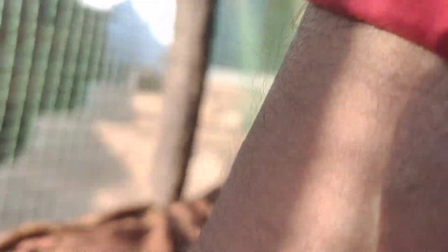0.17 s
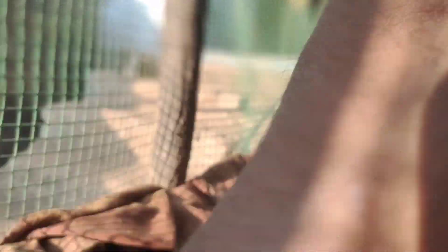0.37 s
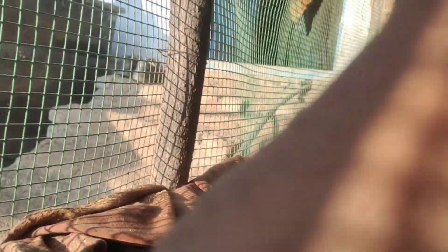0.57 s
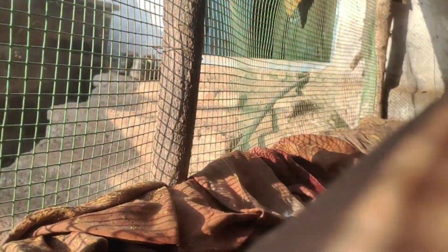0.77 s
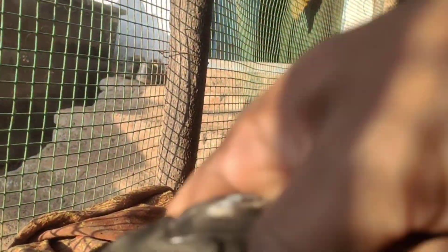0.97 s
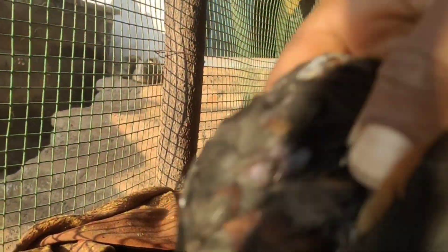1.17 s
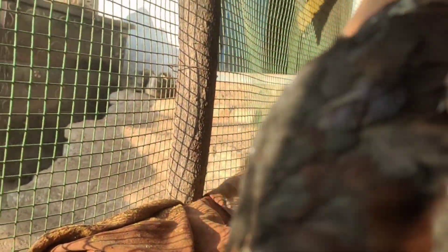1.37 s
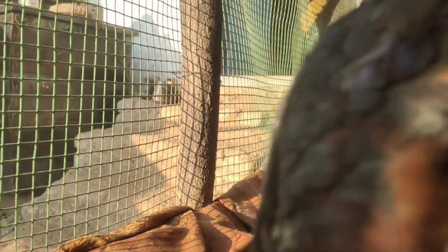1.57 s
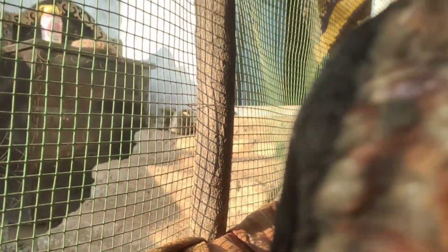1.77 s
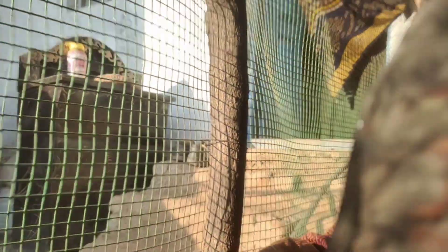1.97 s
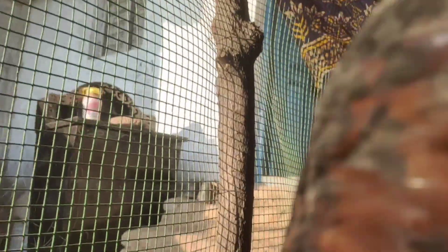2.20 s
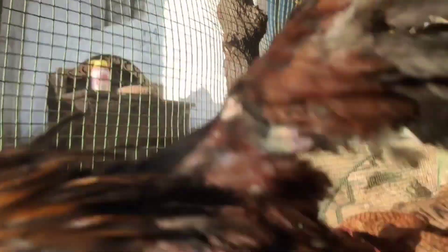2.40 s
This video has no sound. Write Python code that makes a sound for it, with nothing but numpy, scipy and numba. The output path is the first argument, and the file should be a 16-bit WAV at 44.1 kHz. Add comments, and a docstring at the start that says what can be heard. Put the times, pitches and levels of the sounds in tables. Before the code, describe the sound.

A hen gives a run of short clucks, then four raspy squawks close to the microphone as she is handled. Cloth and feathers rustle, the wooden coop is knocked, and air puffs buffet the microphone while other hens murmur faintly.

```python
"""A held hen squawks four times at close range, after a run of clucks in a wire coop.
Her voice follows the source-filter principle: membranes in the syrinx pulse the airflow, and throat
and beak resonances shape it. A second membrane modulates the first, turning a clear tone to a rasp.
Puffs of air strike the right microphone, knocks ring the coop, and cloth and feathers rustle.
A chick peeps, other hens murmur behind, and the yard walls return a short echo."""
import sys
import numpy as np
from scipy import signal
from scipy.fft import rfft, irfft, next_fast_len
from scipy.io import wavfile
from scipy.ndimage import uniform_filter1d, minimum_filter1d, map_coordinates
from numba import njit

SR = 44100
rng = np.random.default_rng(int(sys.argv[2]) if len(sys.argv) > 2 else 0)


def int16_out(signal):
    """Quantize to a 16-bit WAV file."""
    q = np.round(np.clip(np.atleast_2d(signal).T, -1, 1) * 32767)
    wavfile.write(sys.argv[1], SR, q.astype(np.int16))


N = 107559
T = np.arange(N) / SR

# Vocal tract through each squawk: time_s, relative_body_db, treble_db, nominal_throat_hz
TRACT_1 = [(1.062, -22, -49, 1310.0), (1.081, -5.5, -21.5, 1560), (1.11, 6.5, -6.5, 1830),
           (1.143, -14.5, -35, 1460), (1.174, 4.5, -8, 1640.0), (1.205, -17.5, -16, 1500),
           (1.257, -14, -16.5, 1560), (1.275, -12, -23.5, 1370), (1.294, -31, -48, 1430)]
TRACT_2 = [(1.487, -30.0, -37.2, 1320.0), (1.498, -17.6, -29.4, 1380.0), (1.503, -10.1, -19.5, 1380.0),
           (1.53, -14.7, -20.9, 1460.0), (1.575, -18.0, -24.2, 1610.0), (1.61, -18.7, -27.0, 1740.0),
           (1.64, -14.1, -20.6, 1620.0), (1.675, -16.7, -26.9, 1610.0), (1.703, -33.1, -41.1, 1600.0)]
TRACT_3 = [(1.83, -34.9, -36.7, 1590.0), (1.847, -15.0, -29.7, 1390.0), (1.867, -9.1, -20.3, 1800.0),
           (1.91, -14.4, -21.4, 1660.0), (1.95, -15.7, -18.6, 1560.0), (2.02, -12.4, -20.0, 1840.0),
           (2.06, -12.8, -22.9, 1530.0), (2.085, -19.6, -30.7, 1530.0), (2.105, -34.0, -46.1, 1330.0)]
TRACT_4 = [(2.15, -34.2, -36.0, 1240.0), (2.17, -22.0, -35.7, 1370.0), (2.202, -16.9, -29.3, 1330.0),
           (2.219, -21.7, -32.2, 1520.0), (2.225, -12.3, -21.7, 1510.0), (2.25, -14.0, -20.5, 1570.0),
           (2.29, -19.4, -25.3, 1750.0), (2.34, -15.6, -25.9, 1770.0), (2.39, -19.8, -28.4, 1520.0),
           (2.425, -30.7, -32.5, 1520.0)]
# Membrane vibration through each squawk: time_s, pitch_hz, roughness (0 to 1)
VIBRATION_1 = [(1.06, 472.7, 0.18), (1.083, 854.6, 0.14), (1.096, 829.5, 0.13), (1.104, 655.2, 0.66),
               (1.172, 683.3, 0.67), (1.186, 761, 0.11), (1.21, 770.6, 0), (1.228, 785.6, 0.39),
               (1.255, 738.5, 0.14), (1.29, 586, 0.65)]
VIBRATION_2 = [(1.487, 520, 0.94), (1.508, 619, 0.71), (1.532, 715.3, 0.38), (1.57, 692.4, 0.51),
               (1.61, 716, 0.76), (1.645, 739, 0.86), (1.675, 702, 0.89), (1.703, 578, 0.56)]
VIBRATION_3 = [(1.83, 570, 0.47), (1.85, 637.4, .4), (1.865, 905.4, 0.067), (1.876, 921.6, 0.13),
               (1.89, 952.4, 0.9), (1.95, 908.8, 0.78), (1.968, 689.1, 0.65), (2.005, 692.1, 0.52),
               (2.055, 745.4, 0.998), (2.105, 617, 0.96)]
VIBRATION_4 = [(2.15, 537.3, 0.802), (2.205, 629.6, 0.87), (2.23, 741, 0.68), (2.255, 795, 0.39),
               (2.285, 814.6, 0.861), (2.33, 735.5, 0.77), (2.385, 727.5, 0.94), (2.425, 546.3, 1)]
# How the hen faces in each squawk, with pan as left minus right:
# left_lag_ms, body_pan_db, treble_pan_db, second_beak_mode_db, third_beak_mode_db
HEN_POSES = [(0.344, -3.5, -9, -1.5, -3), (0.25, -4, -6, -3, -4.5), (0.37, -5.5, -11, -10, -1.5),
             (0.45, -5.5, -11.5, -4, -32)]
# Upper resonances of the beak: centre_hz, width_hz
BEAK_MODES = [(3000, 410), (4350, 1050), (6400, 500)]
# Short calls: start_s, length_s, peak_pitch_hz, level_db, relative_treble_db
CLUCK_CALLS = [(-.03, 0.064, 677, -21, -5), (0.177, 0.049, 701, -17, -11.5),
               (0.319, .052, 650.7, -17.5, -14.5), (0.589, 0.046, 589.5, -23.5, -10),
               (0.762, .044, 628.4, -21, -6), (0.894, 0.079, 780, -20.5, -9.5),
               (1.438, 0.043, 587, -23.5, -15)]
# Puffs of air: start_s, length_s, level_db
AIR_PUFFS = [(1.203, 0.071, -19), (1.518, 0.018, -23.5), (1.616, 0.053, -31), (1.917, 0.019, -13.5),
             (1.931, 0.067, -19), (1.991, 0.079, -16), (2.232, 0.0068, -16), (2.24, 0.015, -18),
             (2.268, 0.012, -25.5)]
# Spectrum of the buffeting: frequency_hz, relative_db
PUFF_SPECTRUM = [(35, -56), (90, -7.5), (280, 0), (550, -3.5), (1000, -0.5), (3000, -4.5), (16000, -40)]
# Blows on the coop: start_s, thud_db, crack_db
COOP_BLOWS = [(.086, -50, -22.5), (.14, -44, -31), (.189, -46, -28), (.416, -30, -47), (.712, -27.5, -28.5),
              (.875, -32.5, -28), (1.407, -15.5, -10.5)]
# Normal modes of the coop's wood: frequency_hz, relative_db, t60_s
WOOD_MODES = [(284.4, -13, 0.18), (419, -1.5, 0.084), (509.5, -10, 0.067), (673, -7.5, 0.18),
              (1058, -6, 0.069), (1420, -15, 0.036)]
# Spectrum of a blow's crack: frequency_hz, relative_db
CRACK_SPECTRUM = [(200, -20), (1000, 3.5), (2500, -18), (5500, 2), (7000, -3.5), (9000, -13), (16000, -15)]
# Strength of the rubbing: time_s, level_db
RUSTLE_LEVELS = [(0, -39), (0.06, -49), (0.11, -34.5), (0.15, -37.5), (0.24, -26.2), (0.31, -34.5),
                 (0.4, -42), (0.47, -30), (0.58, -30.5), (0.67, -38.5), (0.75, -33.5), (0.82, -37.6),
                 (0.88, -27.5), (0.96, -42.5), (1.03, -32.5), (1.33, -37.9), (1.44, -32), (1.76, -38),
                 (2.12, -40.5), (2.2, -37.5), (2.44, -33)]
# Spectrum of cloth and feathers: frequency_hz, relative_db
RUSTLE_SPECTRUM = [(30, -43), (150, -8), (450, 4.5), (1000, -4), (2000, 0), (3300, 1.5), (5000, -1.5),
                   (6500, 4), (8500, -12.5), (11000, -14.5), (15000, -15.5)]
# Spectrum of the distant hens: frequency_hz, relative_db
MURMUR_SPECTRUM = [(30, -42), (150, -15), (450, -12), (660, 2.5), (850, -12.5), (1150, -4), (1800, -11.5),
                   (16000, -44)]
# The chick's call: start_s, length_s, first_hz, last_hz, level_db
CHICK_PEEPS = [(2.108, .052, 3070, 2940, -34)]


def squawks():
    """Source and filter: a moving throat resonance shapes four forced calls, each in its own pose."""
    throat_scale, body_boost_db = 0.97, 0.5
    source = syrinx(*curves(VIBRATION_1 + VIBRATION_2 + VIBRATION_3 + VIBRATION_4))
    out = np.zeros((2, N))
    for tract, pose in zip([TRACT_1, TRACT_2, TRACT_3, TRACT_4], HEN_POSES):
        lag_ms, body_pan_db, treble_pan_db, second_db, third_db = pose
        body_db, treble_db, nominal_hz = curves(tract)
        voiced = uniform_filter1d(1. * (T > tract[0][0]) * (T < tract[-1][0]), size=300)
        throat_hz = nominal_hz * throat_scale
        body, treble = vocal_tract(source, throat_hz, width_hz=390, beak_db=(0, second_db, third_db))
        out += place(body * voiced * undb(body_db + body_boost_db), lag_ms, body_pan_db)
        out += place(treble * voiced * undb(treble_db), lag_ms, treble_pan_db)
    return out


def syrinx(pitch_hz, roughness):
    """Modulation: with roughness, a second, slower membrane shakes the first in phase and amplitude."""
    jitter, shimmer_db, wobble_hz = 0.07, 2, 462
    second_ratio, second_depth, second_swing_rad = 0.46, 0.68, 0.44
    first_hz = pitch_hz * (1 + jitter * roughness * walk(wobble_hz))
    second_hz = pitch_hz * second_ratio * (1 + 0.1317 * walk(87.1))
    second = roughness * np.sin(phase_of(second_hz))
    phase = phase_of(first_hz) + second_swing_rad * second
    pulses = unit(sum(np.cos(k * phase) * k ** -0.45 * (k * pitch_hz < 15400) for k in range(1, 24)))
    opening = (1 + np.cos(phase)) ** 2  # air hisses through once a cycle
    air = 2.12 * roughness * unit(rng.standard_normal(N) * opening)
    shimmer = undb(shimmer_db * roughness * walk(wobble_hz))
    return (pulses + air) * (1 + second_depth * second) * shimmer


def vocal_tract(source, throat_hz, width_hz, beak_db):
    """Formants: throat and chest resonances give the body, the beak the treble, each at steady rms."""
    source = signal.sosfilt(signal.butter(4, 552, "high", fs=SR, output="sos"), source)
    throat = resonance(source, throat_hz, width_hz)
    chest = undb(-9) * resonance(source, centre_hz=1000, width_hz=380)
    beak = sum(undb(db) * resonance(source, *mode) for mode, db in zip(BEAK_MODES, beak_db))
    return steady(throat + chest), steady(beak)


def clucks():
    """Vocal effort raises pitch and level together; each short call is roughest at its weak ends."""
    edge_roughness, peak_roughness, pitch_sag = 0.65, 0.22, 0.32
    pitch_hz, roughness = np.full(N, 500.), np.full(N, edge_roughness)
    body_gain, treble_gain = np.zeros(N), np.zeros(N)
    for start_s, length_s, peak_hz, level_db, treble_db in CLUCK_CALLS:
        effort = arch(start_s, length_s)
        pitch_hz = np.where(effort > 1e-6, peak_hz * (1 - pitch_sag * (1 - effort)), pitch_hz)
        body_gain += undb(level_db) * effort ** 0.48
        treble_gain += undb(level_db + treble_db) * effort ** 2
        roughness += (peak_roughness - edge_roughness) * effort
    source = syrinx(pitch_hz, roughness)
    body, treble = vocal_tract(source, throat_hz=1210, width_hz=420, beak_db=(5.5, -5, -28))
    return (place(body * body_gain, lag_ms=0.27, pan_db=2.7)
            + place(treble * treble_gain, lag_ms=0.27, pan_db=-0.89))


def puffs():
    """Turbulence: air from the struggling bird buffets the right microphone."""
    envelope = sum(undb(db) * arch(start_s, length_s) for start_s, length_s, db in AIR_PUFFS)
    buffeting = colour(rng.standard_normal(N), PUFF_SPECTRUM) * undb(4.7 * walk(63))
    return place(buffeting * envelope, lag_ms=0, pan_db=-40)


def knocks():
    """Impact excitation: each blow gives a noisy crack and rings the coop's damped wooden modes."""
    thuds, crack_envelope = np.zeros(N), np.zeros(N)
    for start_s, thud_db, crack_db in COOP_BLOWS:
        age_s = np.maximum(T - start_s, 0)
        ringing = sum(undb(db) * np.cos(2 * np.pi * hz * age_s) * decay(age_s, t60_s)
                      for hz, db, t60_s in WOOD_MODES)
        thuds += undb(thud_db) * (T > start_s) * ringing
        crack_envelope += undb(crack_db) * (T > start_s) * decay(age_s, t60_s=0.048)
    noise = np.array([colour(rng.standard_normal(N), CRACK_SPECTRUM) * undb(db) for db in (-4, 0)])
    return place(thuds, lag_ms=0.14, pan_db=-1) + noise * crack_envelope


def rustle():
    """Friction noise: cloth and feathers rub in strokes of dense, uneven grains."""
    grain_db, flutter_db, pan_db = 1, 3.5, -3.5
    grains = np.array([colour(rng.standard_normal(N) * undb(grain_db * walk(1100)), RUSTLE_SPECTRUM)
                       for _ in range(2)])
    strokes = undb(curves(RUSTLE_LEVELS)[0] + flutter_db * walk(32))
    return grains * strokes * undb([[pan_db / 2], [-pan_db / 2]])


def chick():
    """A frequency glide: the peep is a pure tone that falls slightly."""
    out = np.zeros(N)
    for start_s, length_s, first_hz, last_hz, level_db in CHICK_PEEPS:
        pitch_hz = np.interp(T, [start_s, start_s + length_s], [first_hz, last_hz])
        out += undb(level_db) * arch(start_s, length_s) * np.sin(phase_of(pitch_hz))
    return out


def flock():
    """Incoherent sum: the voices of distant hens merge into a gently swelling noise."""
    level_db, swell_db = -38, 2.5
    murmur = colour(rng.standard_normal(N), MURMUR_SPECTRUM)
    envelope = undb(level_db + swell_db * np.tanh(walk(11)))
    return place(murmur * envelope, lag_ms=0.13, pan_db=1)


def yard_echo(direct):
    """Reverberation: wall reflections act as convolution with a decaying noise of unit energy."""
    envelope = (T > 0.004) * decay(T, t60_s=0.073)
    tails = [unit(rng.standard_normal(N) * envelope) / np.sqrt(N) for _ in range(2)]
    return np.array([signal.fftconvolve(side, tail)[:N] for side, tail in zip(direct, tails)])


def undb(db):
    """Amplitude ratio of a level in decibels."""
    return 10 ** (np.asarray(db) / 20)


def unit(x):
    """Normalisation to rms 1."""
    return x / np.sqrt(np.mean(x ** 2))


def steady(x):
    """Division by the running rms holds the level near 1 over a few milliseconds."""
    power = uniform_filter1d(uniform_filter1d(x * x, size=200), size=200)
    return x / np.sqrt(np.abs(power) + 1e-12)


def curves(rows):
    """Linear interpolation of each column of a timed table."""
    times, *columns = np.array(rows, float).T
    return [np.interp(T, times, column) for column in columns]


def phase_of(hz):
    """Phase in radians is the time integral of angular frequency."""
    return 2 * np.pi * np.cumsum(hz) / SR


def decay(age_s, t60_s):
    """Exponential damping, by 60 dB in t60_s."""
    return np.exp(-np.log(1000) * age_s / t60_s)


def arch(start_s, length_s):
    """A half-sine envelope, zero outside the event."""
    return np.maximum(np.sin(np.pi * np.clip((T - start_s) / length_s, 0, 1)), 0)


def walk(cutoff_hz):
    """Low-passed noise gives smooth random motion of rms 1."""
    rolloff = 1 + (np.fft.rfftfreq(N, 1 / SR) / cutoff_hz) ** 4
    return unit(irfft(rfft(rng.standard_normal(N)) / rolloff, N))


def colour(x, spectrum):
    """Spectral shaping along a logarithmic frequency axis, at rms 1."""
    hz, db = np.array(spectrum, float).T
    size = next_fast_len(N + 4096)
    bin_hz = np.fft.rfftfreq(size, 1 / SR) + 1
    gain = undb(np.interp(np.log(bin_hz), np.log(hz), db))
    return unit(irfft(rfft(x, size) * gain, size)[:N])


def place(x, lag_ms, pan_db):
    """Time and level differences give direction: the left side lags and is offset by pan_db."""
    left = map_coordinates(x, [np.arange(N) - lag_ms * SR / 1000], order=3)
    return np.array([left * undb(pan_db), x]) / np.sqrt((1 + undb(pan_db) ** 2) / 2)


@njit
def bandpass(x, centre_hz, width_hz):
    """Two integrators in a loop form a damped resonator with a moving centre."""
    out, band_state, low_state = np.empty(len(x)), 0., 0.
    for i in range(len(x)):
        tuning, damping = np.tan(np.pi * centre_hz[i] / SR), width_hz / centre_hz[i]
        band = (band_state + tuning * (x[i] - low_state)) / (1 + tuning * (tuning + damping))
        band_state = 2 * band - band_state
        low_state += 2 * tuning * band
        out[i] = damping * band
    return out


def resonance(x, centre_hz, width_hz):
    """Two wider band-passes in cascade give steep skirts and a bandwidth near width_hz."""
    centre_hz = centre_hz * np.ones(N)
    return bandpass(bandpass(x, centre_hz, 1.5 * width_hz), centre_hz, 1.5 * width_hz)


def scene():
    """Superposition: the calls and knocks, their echo, and the air, rustle and birds around them."""
    direct = clucks() + squawks() + knocks()
    return direct + undb(-16) * yard_echo(direct) + puffs() + rustle() + flock() + chick()


def record(dry):
    """Peak limiting holds down the loudest moments; a low-pass filter then cuts the highest treble."""
    ceiling, window_samples, cutoff_hz = 0.92, 221, 15400
    allowed_gain = np.minimum(1, ceiling / (np.abs(dry).max(axis=0) + 1e-9))
    gain = uniform_filter1d(minimum_filter1d(allowed_gain, window_samples), window_samples)
    return signal.sosfilt(signal.ellip(8, 0.2, 70, cutoff_hz, fs=SR, output="sos"), dry * gain)


dry = scene()
out = record(dry)
int16_out(out)
```